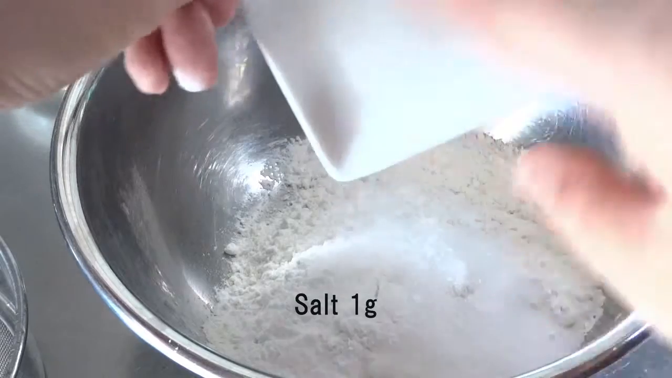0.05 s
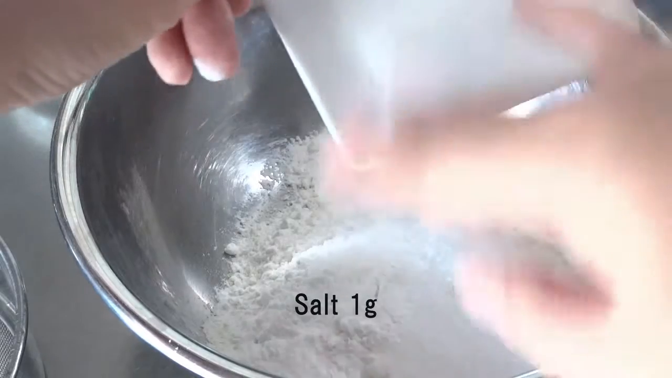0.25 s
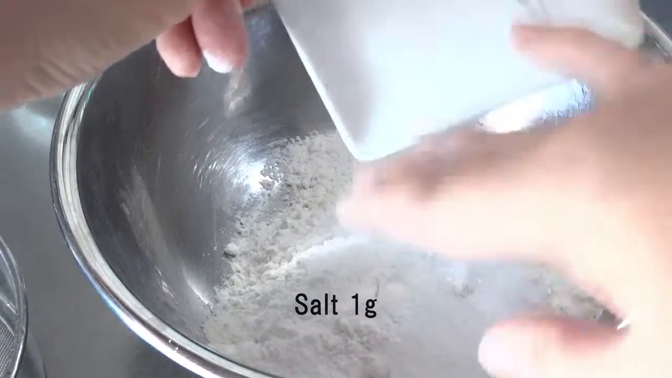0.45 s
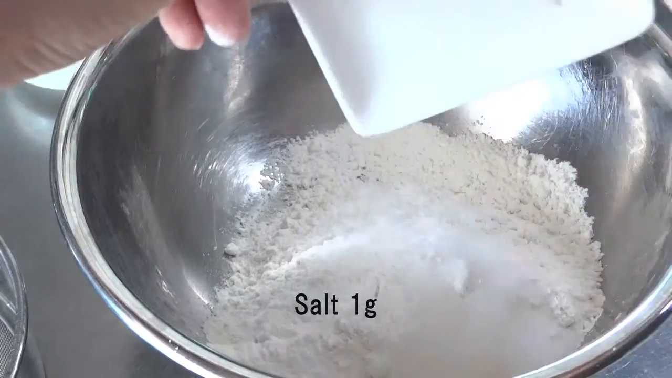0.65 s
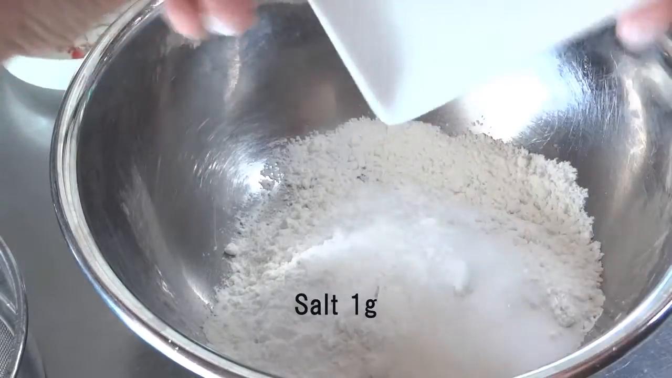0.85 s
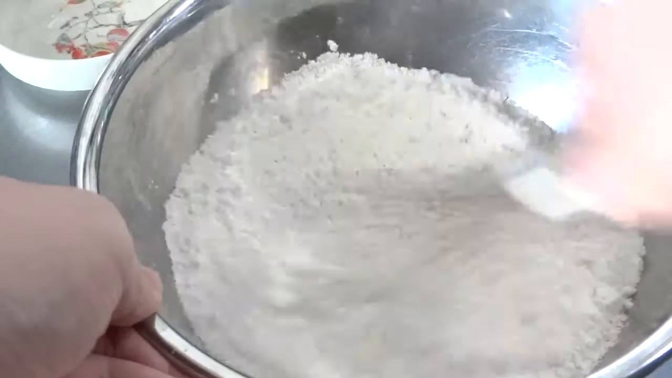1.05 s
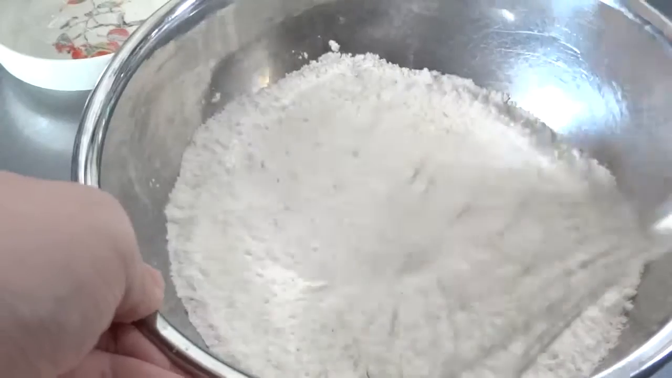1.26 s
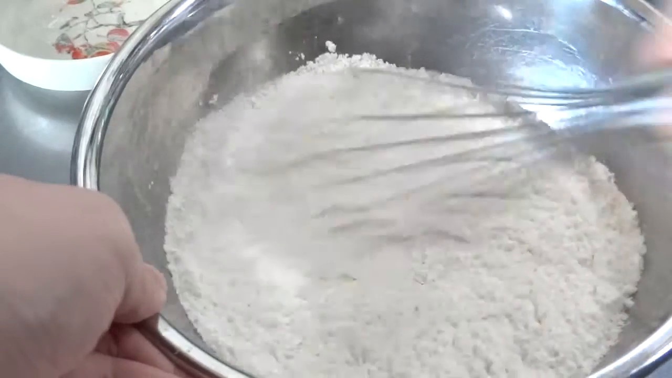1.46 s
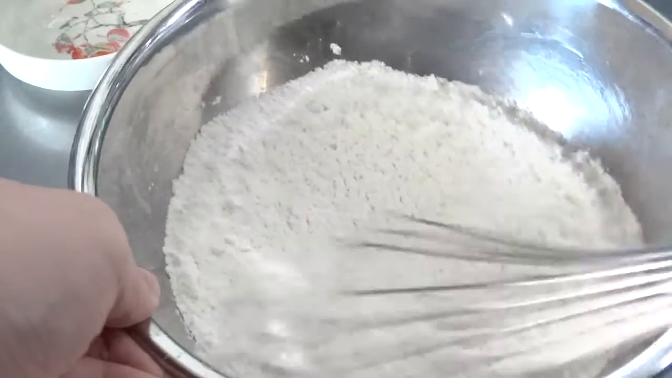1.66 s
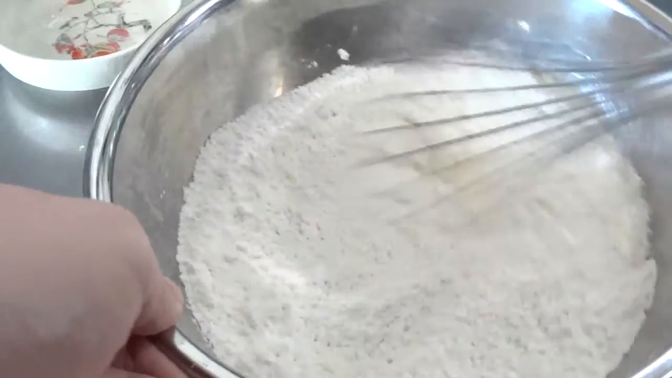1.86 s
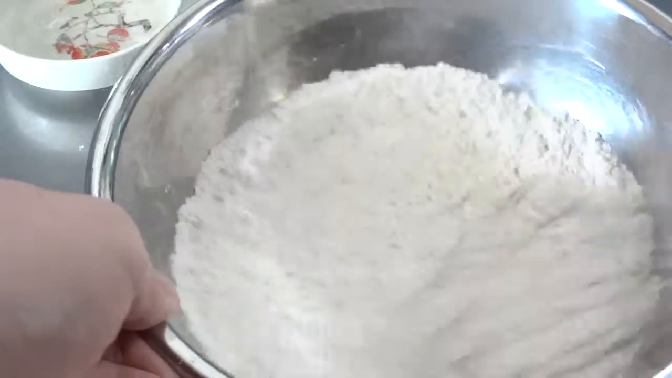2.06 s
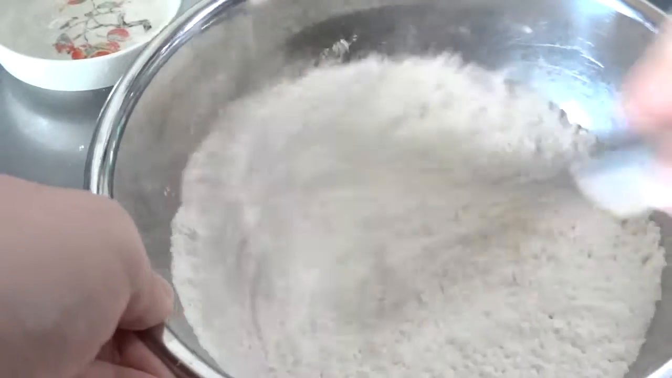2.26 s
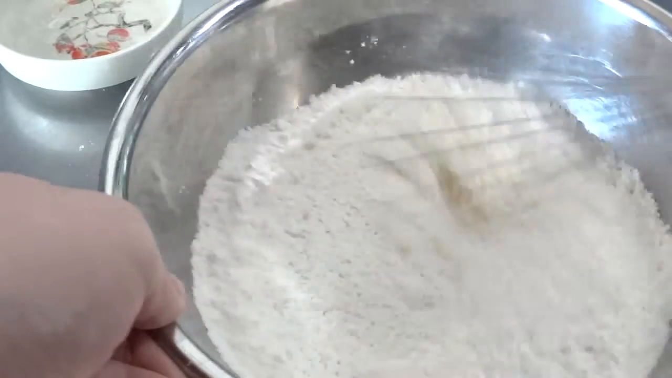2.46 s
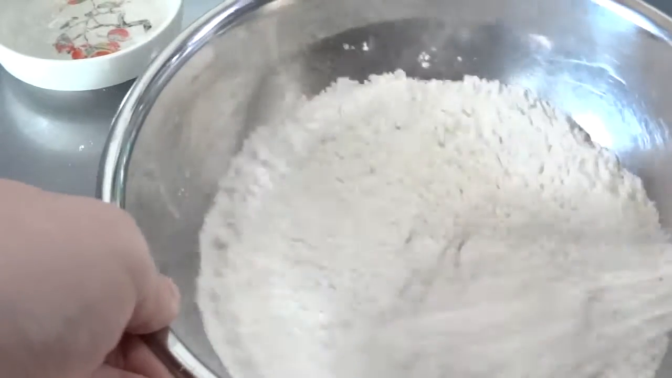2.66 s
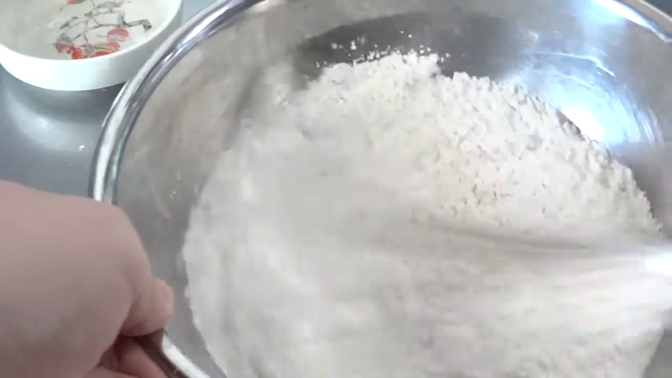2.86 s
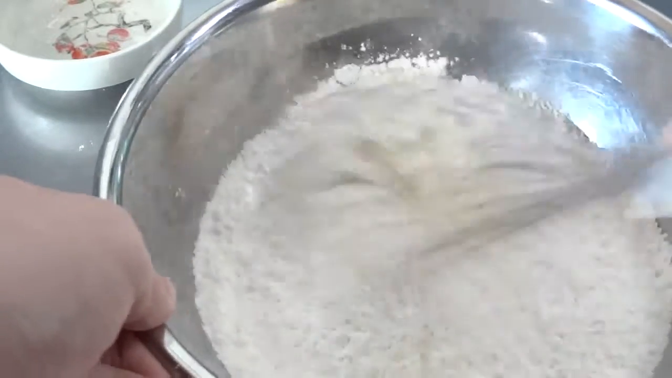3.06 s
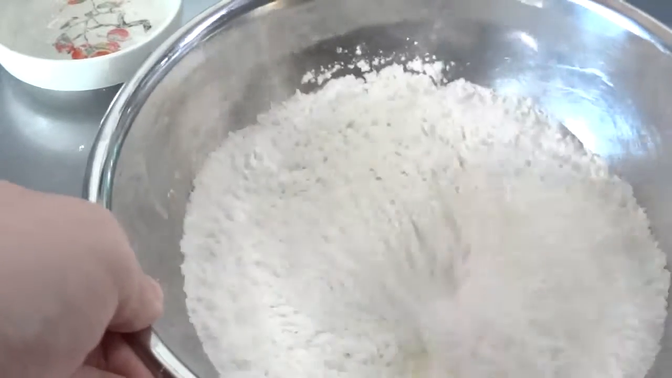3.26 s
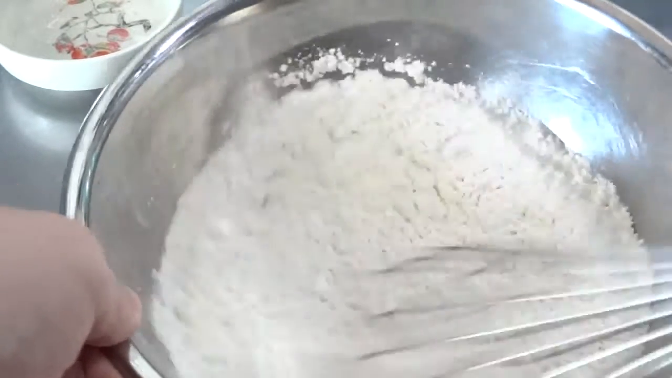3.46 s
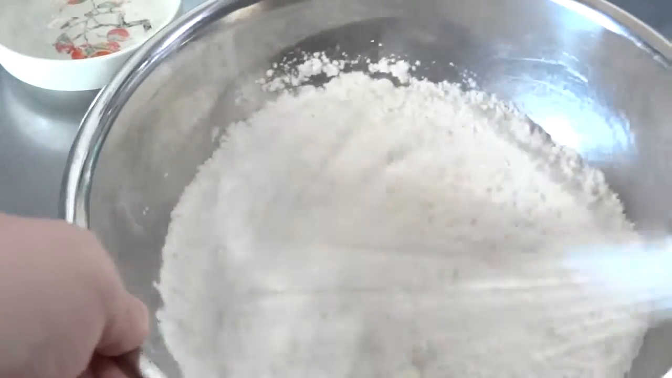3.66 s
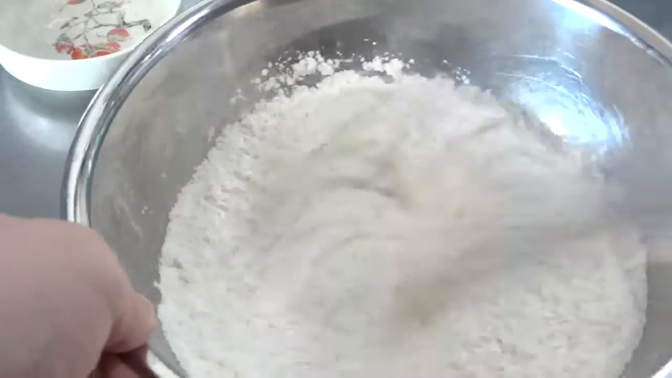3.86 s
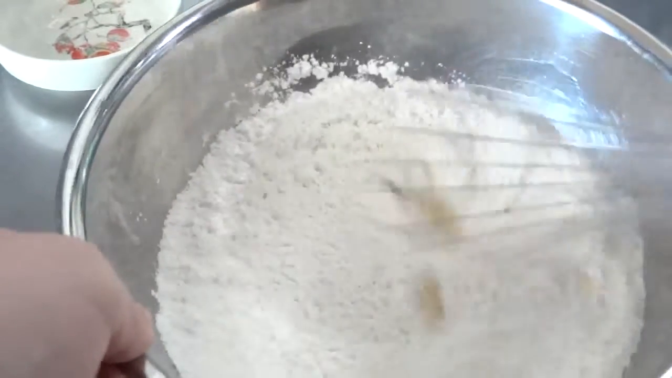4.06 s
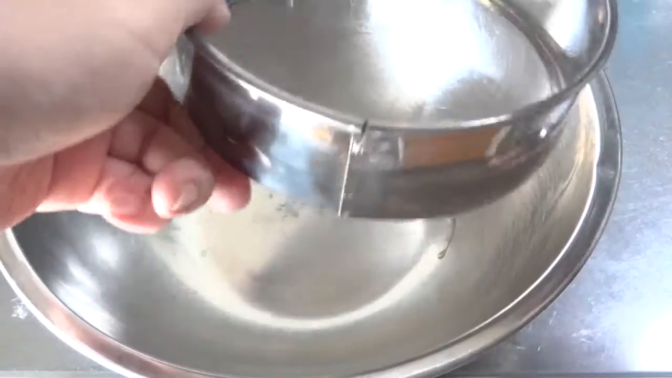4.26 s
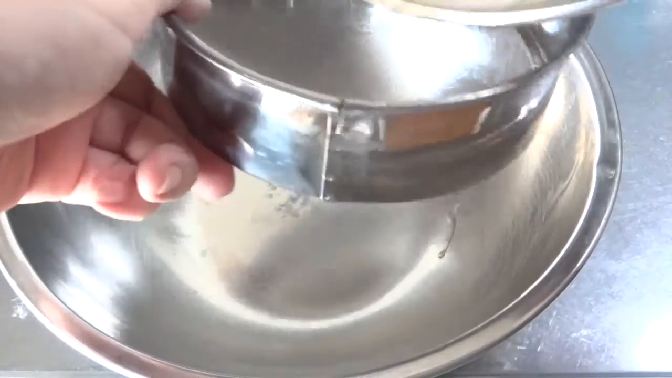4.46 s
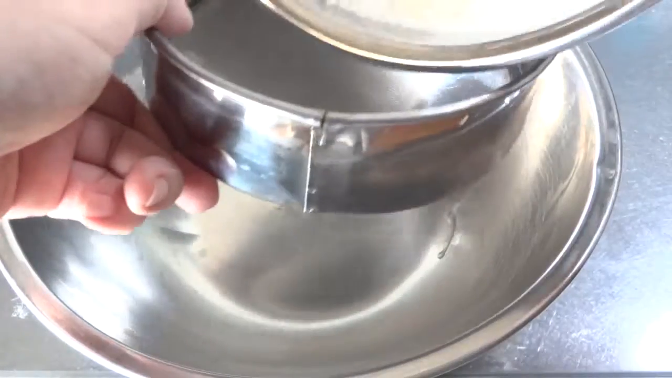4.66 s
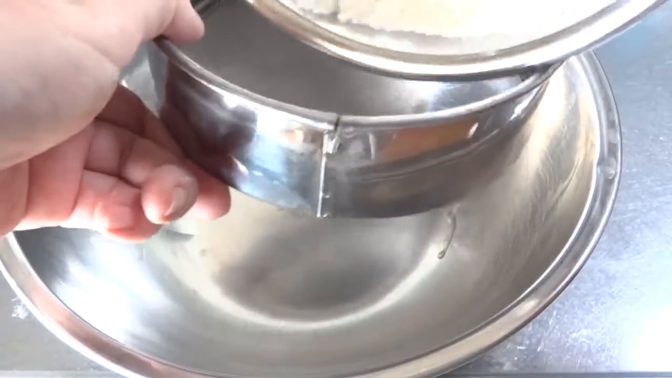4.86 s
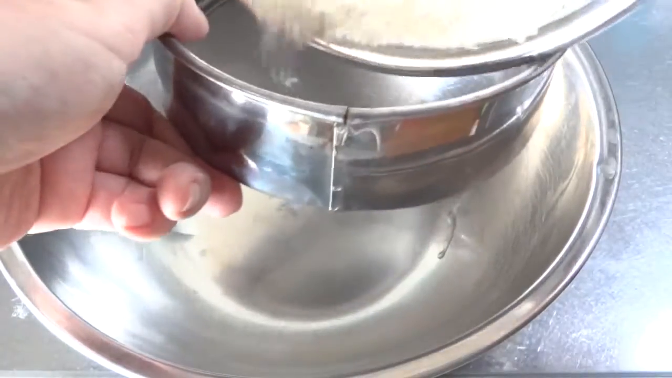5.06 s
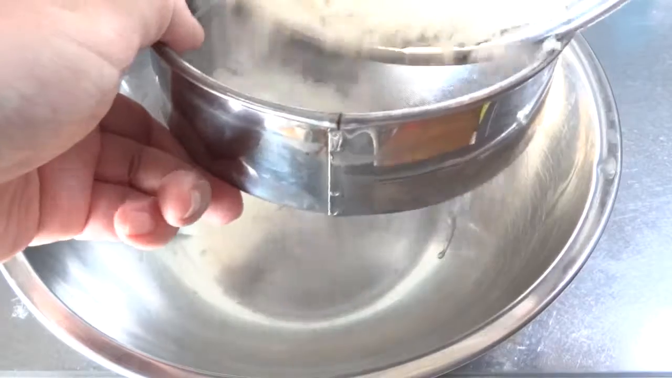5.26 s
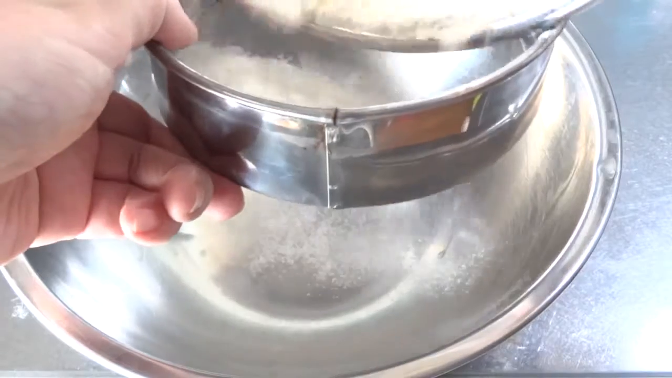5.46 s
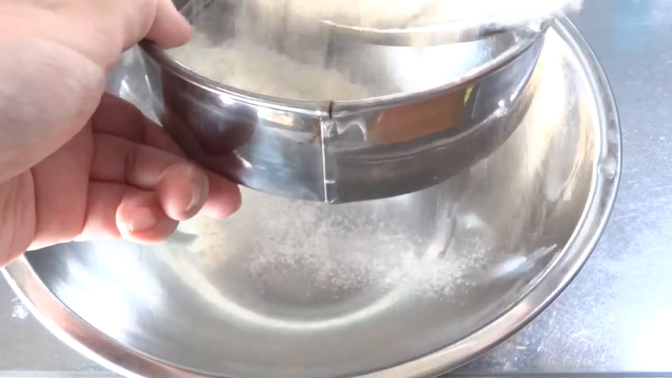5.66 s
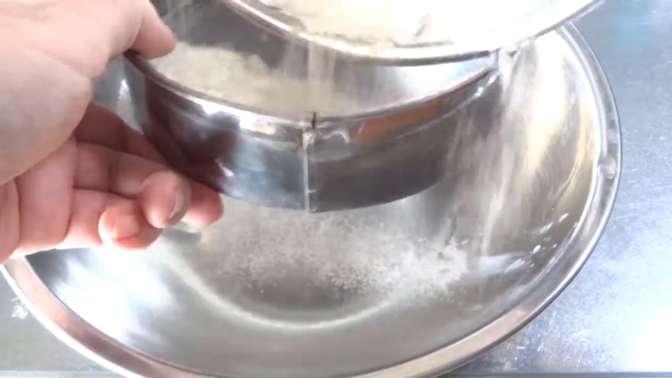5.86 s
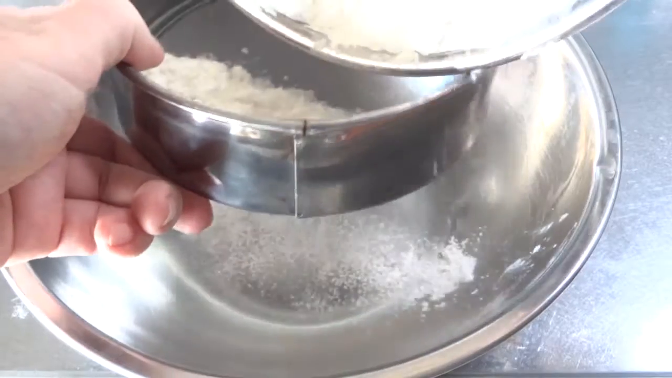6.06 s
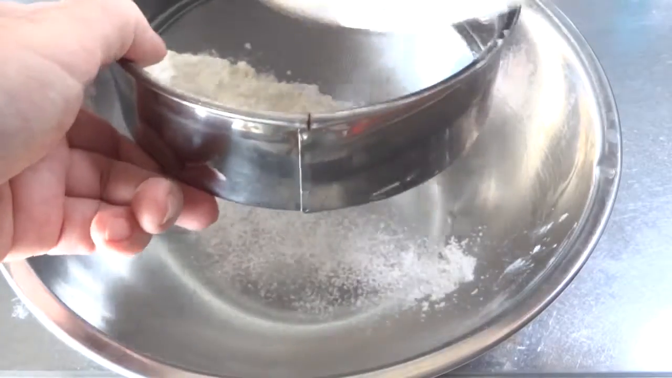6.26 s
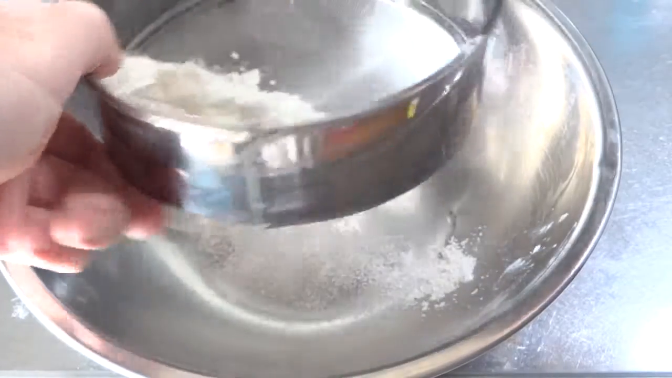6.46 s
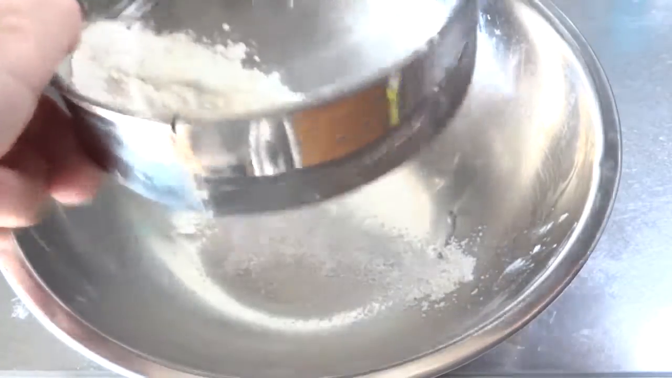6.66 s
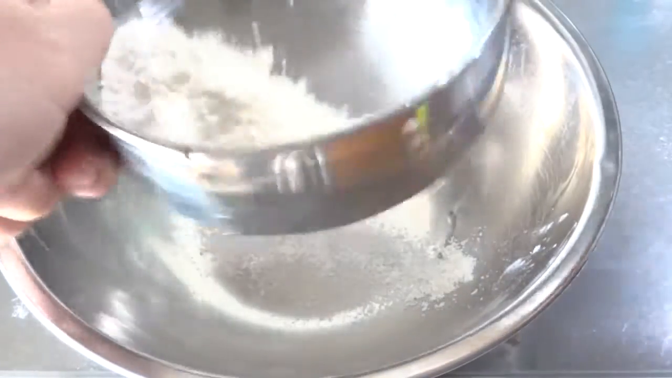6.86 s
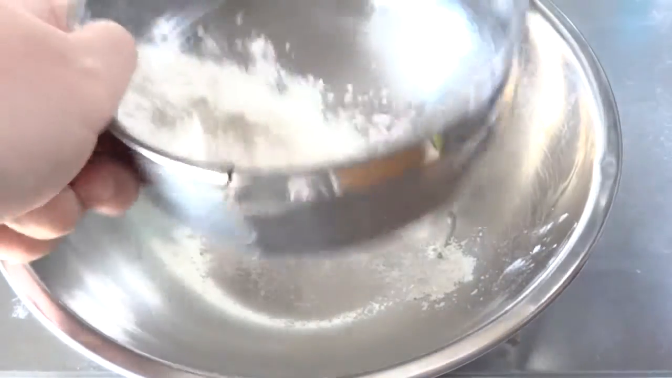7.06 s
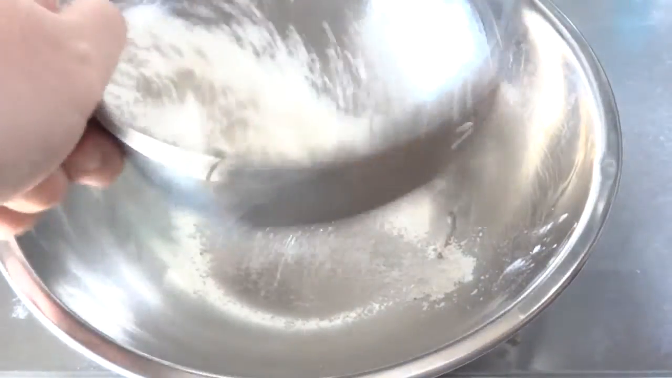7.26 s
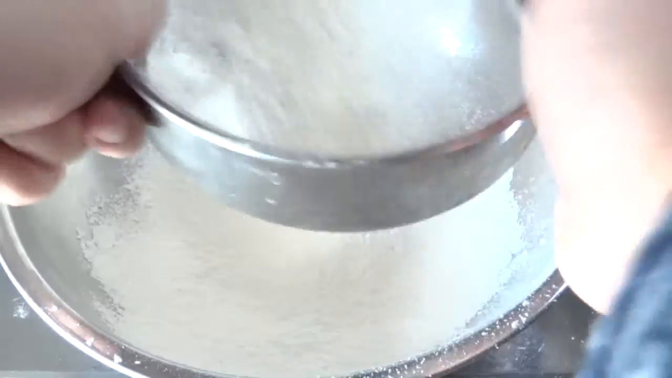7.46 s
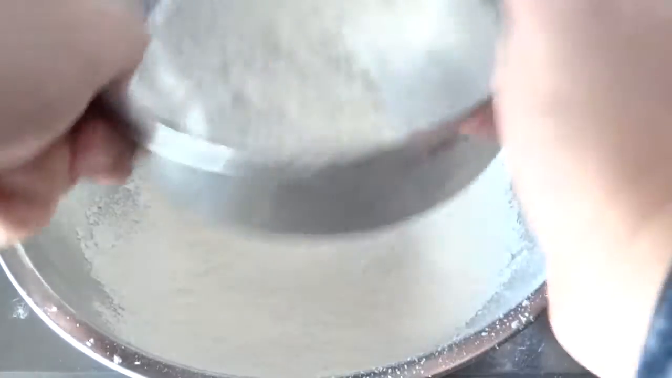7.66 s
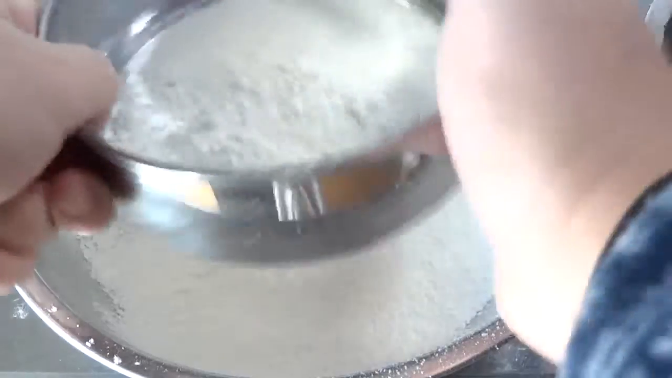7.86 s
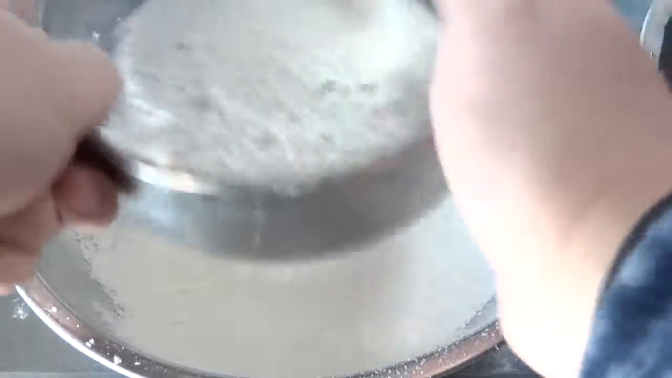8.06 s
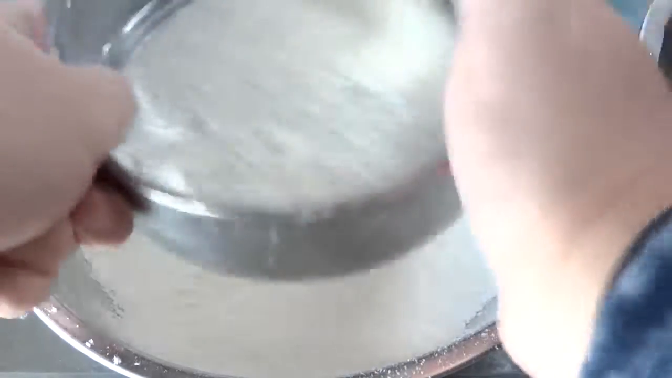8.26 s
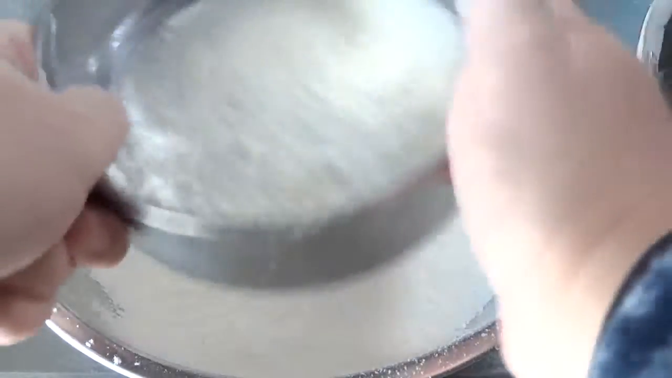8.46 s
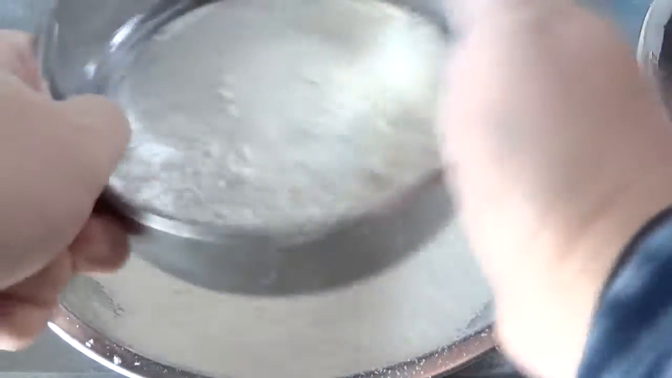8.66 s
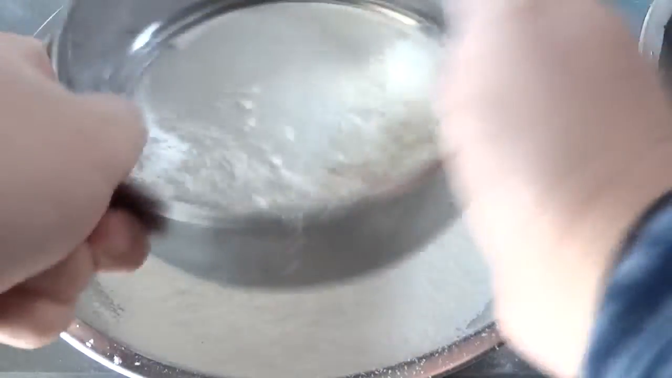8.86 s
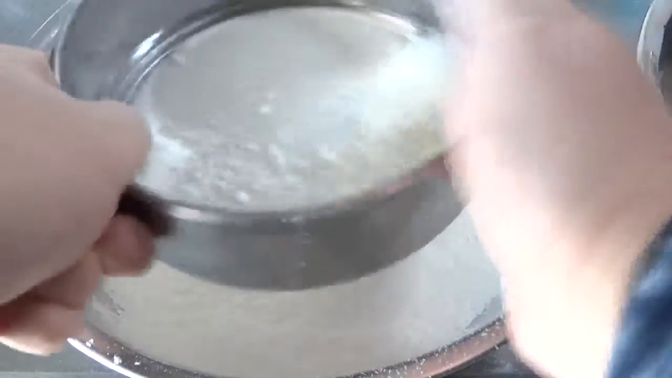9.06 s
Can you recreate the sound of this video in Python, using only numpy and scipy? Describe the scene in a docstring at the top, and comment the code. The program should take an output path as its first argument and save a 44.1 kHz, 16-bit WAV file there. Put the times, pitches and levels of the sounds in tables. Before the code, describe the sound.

In a small kitchen, heard close with a short room tail and quiet room noise, salt trickles in faint, fine pinches at about 0.2, 0.5 and 0.75 s. At 1.1 s a cut brings brisk whisking until 4.2 s: some eight or nine uneven strokes a second, wires scraping steel, powdery hiss, hard knocks strongest around 1.75 and 1.96 s, thin wire snaps and soft low thuds. From 4.3 s a low fan hum sits behind. The tipped bowl bumps a sieve at 4.5 s, clinks brightly at 4.75 and 4.97 s, slides briefly, and clinks more softly to 5.5 s. At 6.17 s the empty bowl lands on the counter with a lower ring, knocks again, then judders and scrapes near 6.4 s. From 7.4 to 9.2 s the sieve hoop is tapped five times a second, dry metallic pats with flour swishing back and forth.

```python
"""Salt trickles, a whisk scrapes and knocks in a steel bowl, the bowl clinks on a sieve, lands on the counter,
and the sieve is tapped with a powdery swish: baking in a small kitchen, in four shots.
Blows are clicks with a dying chatter that ring steel modes; rubs are streams of tiny slips through the same steel;
salt and flour are coloured grains. Room noise lies under everything, and a fan hums behind the last two shots."""
import sys
import numpy as np
from scipy import signal
from scipy.fft import rfft, irfft, next_fast_len
from scipy.io import wavfile

SR = 44100
rng = np.random.default_rng(int(sys.argv[2]) if len(sys.argv) > 2 else 0)


def master_out(mix):
    """Clip the mix to full scale and print it as 16-bit PCM to the path in sys.argv[1]."""
    frames = np.transpose(np.atleast_2d(mix))
    ceiling = np.clip(frames, -1, 1)
    pcm = np.round(ceiling * 32767).astype(np.int16)
    wavfile.write(sys.argv[1], SR, pcm)


N = 401784
TIME = np.arange(N) / SR

# All levels in the tables are the designer's balance within a layer; each layer adds its own trim.

# Spans of the shots: start and end in seconds; the salt plays before the whisk shot.
WHISK_SHOT, POUR_SHOT, SIFT_SHOT = (1.112, 4.225), (4.305, 7.328), (7.352, 9.2)
CUTOFF_HZ = 15900

# Room noise colour. Each row: frequency in Hz, relative level in dB.
ROOM_COLOUR = [(12, -32), (20, -2), (53, -2.5), (130, -12.5), (337, -12), (558, -16.5), (1060, -18),
               (1220, -17.5), (1370, -17.5), (2460, -18), (3740, -19.5), (13500, -22.5), (16000, -24.5)]
# Low room tone colour. Each row: frequency in Hz, relative level in dB.
LOW_ROOM_COLOUR = [(24, -29), (34, -1), (46, -26), (200, -90)]
# Stereo likeness of the background. Each row: frequency in Hz, left-right correlation (0 to 1).
LIKENESS = [(30, .88), (100, 0.64), (300, 0.17), (1000, 0.086), (4000, 0.039), (16000, .05)]
ROOM_DB, LOW_ROOM_DB = -64, -71.5

# Shakes of the salt dish. Each row: peak time in seconds, level in dB.
SALT_SHAKES = [(0.22, -67.5), (0.5, -66.5), (0.745, -71)]
# Colour of falling salt. Each row: frequency in Hz, relative level in dB.
SALT_COLOUR = [(2500, -28), (4300, -9), (4700, 3), (5100, -16), (8200, -10), (8800, -5), (9400, -12),
               (16000, -17)]
SALT_RISE_S, SALT_FALL_S = .06, .04   # each pinch swells and dies away

# Strokes of the whisk. Each row: time of the hardest push in seconds, level of wires on steel in dB,
# half length in seconds, bowl body in dB relative to the wires, extra powder hiss in dB.
STROKES = [(1.119, -53.5, 0.024, 4.5, -1), (1.222, -43, 0.023, -2.5, -5), (1.33, -47, 0.036, -12, -2),
           (1.394, -54, 0.014, 8, -2), (1.511, -38, .027, -8.5, -2.5), (1.618, -45, 0.042, -3, -0.5),
           (1.801, -38.5, 0.03, -5.5, -1.5), (1.934, -43.5, 0.027, -6, -1), (2.06, -50, .04, 0, -1),
           (2.166, -49.5, 0.04, -18, -1.5), (2.291, -46.5, 0.04, -13, -0.5),
           (2.413, -42.5, 0.035, -10.5, 3), (2.587, -45.5, 0.04, -1.5, -1.5), (2.675, -42.5, 0.034, -8, 0),
           (2.755, -42.5, 0.035, -4, 4.5), (2.878, -45.5, 0.032, 0.5, -1.5), (2.993, -42, 0.015, -5.5, -3),
           (3.052, -46.5, 0.039, -8.5, 4.5), (3.177, -50, 0.041, 2, -1), (3.328, -42, 0.039, -4, 0),
           (3.444, -45, 0.034, -2, 0.5), (3.599, -45, 0.044, -2, 2.5), (3.734, -43.5, .028, -4.5, 5),
           (3.863, -40, 0.035, -8, 2), (4.002, -45.5, 0.035, 0, 3.5), (4.122, -40.5, 0.039, -10.5, 2.5),
           (4.206, -50.5, 0.017, 1, -2)]
STROKE_RISE, STROKE_FALL = 0.95, 1.055   # shares of the half length
DRAG_DB, DRAG_BODY_DB, DRAG_HISS_DB = -55, -59, -53.5   # the whisk keeps moving between strokes
USUAL_STROKE_DB, USUAL_HISS_DB, HISS_FOLLOWS = -44.5, -47.5, 0.6   # hiss grows more slowly than the scrape
PUSH_DB, PUSH_SHARE_DB = -62, -7   # shoved flour: a steady part and a part that follows the bowl body
# The whisk comes clear of the flour for a moment. Each row: time in seconds, loss in dB.
LIFTS = [(1.453, 10), (1.742, 4.5)]
LIFT_S = 0.016
# Whisk knocks on the bowl. Each row: start in seconds, level in dB, bass tilt in dB, treble tilt in dB
# (both count against the mean of the table), 60 dB decay of the chatter in seconds.
WHISK_KNOCKS = [(1.209, -28, -18, -24, 0.099), (1.474, -32.5, -23, -19, 0.087),
                (1.493, -26.5, -22, -17, 0.16), (1.589, -31, -7, -17, 0.14), (1.649, -24, -21, -6.5, 0.09),
                (1.758, -20.5, -43, -21, 0.067), (1.779, -20.5, -23, -19, 0.092),
                (1.964, -16.5, -19, -2.5, 0.11), (2.043, -26.5, 6, -18, 0.15),
                (2.268, -23, -27, -20.5, 0.12), (2.559, -36, 10, -21, 0.11), (3.424, -24.5, -23, -19, 0.16),
                (3.719, -29.5, -14, -12, 0.16), (3.859, -28.5, -2, -18, 0.19), (4.108, -35, -34, 5, 0.11)]
# Wires snapping against the wall. Each row: start in seconds, level in dB, bass tilt in dB,
# treble tilt in dB, 60 dB decay of the chatter in seconds.
WIRE_SNAPS = [(1.3299, -39, -19, -11, 0.08), (1.5554, -27.5, -26, -7, 0.053), (1.9365, -31.5, -10, 3, 0.11),
              (2.2667, -39, -13, -24, 0.078), (2.6694, -31, -15, -12, 0.077),
              (2.9786, -25.5, -16.5, -16, 0.07), (3.1009, -32.5, -31, -27, 0.06),
              (3.5994, -47, -7, -6, 0.067)]
# Pressed whisk thudding the bowl on the counter. Each row: peak time in seconds, level in dB,
# rise and fall width in seconds.
THUDS = [(2.59, -50, 0.017), (2.63, -50.5, 0.033), (2.75, -50, 0.028), (2.87, -50.5, 0.028),
         (3.185, -46.5, 0.027), (3.9, -47.5, 0.025)]
# Modes of the bowl with flour in it. Each row: nominal frequency in Hz, relative level in dB, t60 in seconds.
FULL_BOWL = [(361, -6, 0.13), (443, -6.5, 0.15), (740.6, -0.5, 0.17), (880, -12, 0.039),
             (1182, -2.5, 0.073), (1299, 14, 0.04), (2280, -9, .04), (2900, -15, 0.024), (3280, 2, 0.032),
             (3960, 4, 0.044), (4150, 4.5, 0.035), (7700, 1, .015)]
# Modes of the whisk wires. Each row: nominal frequency in Hz, relative level in dB, t60 in seconds.
WIRE_MODES = [(2895, 7, 0.061), (3270, -8, 0.12), (3930, 1, 0.041), (3800, 7.5, 0.078), (4100, -3, 0.055)]
# Colour of the stirring. Each row: frequency in Hz, relative level in dB.
WHISK_COLOUR = [(41, -74), (70, -18), (98, -12), (145, -14.5), (451, -1.5), (606, -2.5), (761, 7.5),
                (955, 2), (1310, -4), (1690, -4.5), (2320, -6.5), (4000, -7), (4480, -10), (11900, -16),
                (16000, -20)]
# Colour of the wire snaps. Each row: frequency in Hz, relative level in dB.
WIRE_COLOUR = [(250, -20), (700, -2), (1700, -11), (2900, -11), (4000, 5), (4700, -12.5), (16000, -24)]
# Colour of the thuds. Each row: frequency in Hz, relative level in dB.
THUD_COLOUR = [(30, -13), (70, 4.5), (110, -7), (145, -11.5), (230, -3.5), (350, -3.5), (480, -4.5),
               (800, -15), (3000, -64)]

# Rumble of the working hands. Each row: frequency in Hz, relative level in dB.
RUMBLE_COLOUR = [(20, -6), (35, -7.5), (90, -0.5), (140, -11.5), (250, -7), (600, -68)]

# Fan noise colour. Each row: frequency in Hz, relative level in dB.
FAN_COLOUR = [(76, -35), (130, -35), (167, -1.5), (198, -5), (230, -11.5), (368, -4), (427, -7.5),
              (1270, -16.5), (2000, -18.5), (2600, -55), (4400, -120)]
# Fan tones. Each row: frequency in Hz, centre level in dB.
HUM = [(53.8, -69), (166.9, -80.5), (231.5, -71.5), (328.4, -77.5)]

# Bowl bumping the sieve. Each row: start in seconds, level in dB, bass tilt in dB, treble tilt in dB,
# 60 dB decay of the chatter in seconds.
BOWL_BUMPS = [(4.489, -27.5, -15, -15, 0.04), (4.529, -35, -19, -25, 0.035)]
# Bowl rim clinking on the sieve. Each row: start in seconds, level in dB, bass tilt in dB,
# treble tilt in dB, 60 dB decay of the chatter in seconds.
RIM_CLINKS = [(4.735, -34.5, -14, -30, 0.03), (4.747, -15.5, -27.5, -16, 0.044),
              (4.753, -17.5, -26, -19, 0.055), (4.966, -17, -27, -20.5, 0.019),
              (5.287, -28, -22.5, -21, 0.048), (5.401, -27, -19.5, -18, 0.046),
              (5.544, -42.5, -19, -17, 0.041)]
# Slips of the rim along the sieve. Each row: peak time in seconds, level in dB, half length in seconds.
RIM_SLIPS = [(4.985, -50, 0.055), (5.062, -41, .016), (5.124, -44.5, .02), (5.18, -45.5, .018),
             (5.42, -56, .04), (5.5, -52, .015), (5.759, -61, .018), (5.92, -68, 0.044)]
# Modes of the bowl wall. Each row: nominal frequency in Hz, relative level in dB, t60 in seconds.
WALL_MODES = [(673, -4.5, 0.38), (1090, -13, 0.28), (1240, -13.5, .3), (1770, -7, .25), (1710, -2.5, .25),
              (2190, -3, .25), (2340, -3, 0.18), (2750, -4, .15), (3400, -10, 0.178)]
# Rim modes, also lent to the sieve hoop. Each row: nominal frequency in Hz, relative level in dB, t60 in seconds.
RIM_MODES = [(1710, -16, 0.49), (2006, 2, 0.2), (2126, -5, 0.14), (2374, -43, 0.77), (2720, -12, 0.18),
             (2960, -2.5, 0.15), (3030, -18, 0.053), (3620, -28, 0.11), (3320, -22, 0.3),
             (3820, -15, 0.074), (3865, -16, 0.2), (3760, -20, 0.26), (4960, -22, 0.19), (5200, -42, 0.25),
             (5900, -28, 0.28), (6700, -35, 0.14), (7445, -36, 0.21), (8947, -28, 0.25)]
# Colour of the wall bumps. Each row: frequency in Hz, relative level in dB.
WALL_COLOUR = [(180, -59), (300, -18), (331, -19), (614, -6.5), (667, -7), (900, -13), (2210, -5),
               (2480, -8), (2740, -13.5), (14700, -31), (16000, -44)]
# Colour of the rim. Each row: frequency in Hz, relative level in dB.
RIM_COLOUR = [(200, -38), (400, -22), (680, -7.5), (850, -18.5), (1100, -9.5), (1650, -13), (2100, -6),
              (2600, -5.5), (3100, -0.5), (3600, -4.5), (4100, -10.5), (4700, -20.5), (8800, -20.5),
              (16000, -31)]

# Bowl landing on the counter. Each row: start in seconds, level in dB, bass tilt in dB, treble tilt in dB,
# 60 dB decay of the chatter in seconds.
SET_DOWN = [(6.172, -23, -20.5, -35, 0.14), (6.283, -38.5, -7.5, -29, 0.072)]
# The foot catching on the counter. Each row: start in seconds, level in dB, bass tilt in dB,
# treble tilt in dB, 60 dB decay of the chatter in seconds.
FOOT_CATCHES = [(6.391, -36.5, -12, -38, 0.067), (6.442, -38, -7, -22, 0.073), (6.467, -38, -6, -23, 0.06),
                (6.496, -43.5, -11, -21, 0.06)]
# Modes of the empty bowl. Each row: nominal frequency in Hz, relative level in dB, t60 in seconds.
EMPTY_BOWL = [(524, -0.5, 0.45), (641, -21, .23), (904, -27, 0.22), (1590, -13, 0.22), (1717, -6, 0.15),
              (1835, -18, .22), (2220, -3.5, 0.12), (2430, -22, 0.13), (2940, -25, .18), (4360, -13, .12),
              (6158, -25, .15)]
# Modes of the bowl pressed on the counter. Each row: nominal frequency in Hz, relative level in dB, t60 in seconds.
PRESSED_BOWL = [(455, -2, 0.11), (507, 2, 0.14), (746, -3, 0.14), (1053, -3, .08)]
# Colour of the foot's blows. Each row: frequency in Hz, relative level in dB.
FOOT_COLOUR = [(190, -70), (330, -30.5), (520, -1.5), (592, -16.5), (743, -12.5), (1420, -19.5),
               (1540, -19.5), (2070, -17), (2240, -17.5), (3590, -33.5), (7830, -33), (16000, -44)]
# Colour of the foot rubbing on the counter. Each row: frequency in Hz, relative level in dB.
SHOVE_COLOUR = [(200, -45), (350, -17), (600, -3), (1000, -6), (2200, -8), (3200, -10), (4000, -24),
                (8000, -21), (16000, -32)]
# the bowl foot is shoved once over the counter
SHOVE_S, SHOVE_DB, SHOVE_RISE_S, SHOVE_FALL_S = 6.39, -58, 0.034, .06

# Knocks of the hoop on the hand. Each row: start in seconds, level in dB, bass tilt in dB, treble tilt in dB,
# level of the flour thrown in dB, lag of its swish in seconds.
SIEVE_TAPS = [(7.405, -31, -16, -18, -55.5, 0.037), (7.575, -29.5, -22, -15, -63, .025),
              (7.78, -37, -18, -16, -66, 0.021), (7.987, -40, -16, -7, -53, -0.0097),
              (8.188, -30.5, -12.5, -8, -52, 0.0086), (8.382, -28.5, -19, -12.5, -57.5, 0.027),
              (8.572, -27.5, -18.5, -13, -58, 0.021), (8.765, -33.5, -13.5, -12.5, -58, 0.024),
              (8.973, -27.5, -16.5, -17, -57, .055)]
# Colour of the hoop knocks. Each row: frequency in Hz, relative level in dB.
SIEVE_COLOUR = [(53, -34), (90, -7), (196, -4), (593, -3.5), (1040, -5), (1350, -11.5), (1640, -10),
                (1830, -12), (2130, -4.5), (3360, 0.5), (4860, -8), (11600, -10.5), (14700, -18),
                (16000, -23)]
# Colour of flour on the mesh. Each row: frequency in Hz, relative level in dB.
MESH_COLOUR = [(600, -28), (1000, -15), (1700, -9), (3400, 1), (4800, -3), (7000, -4.5), (10000, -2.5),
               (13000, -5), (16000, -10)]
TAP_CHATTER_S = 0.042
SWISH_RISE_S, SWISH_FALL_S = 0.029, 0.026
# flour slides back as the hoop is drawn away for the next knock
BACKSWISH_LEAD_S, BACKSWISH_DB, BACKSWISH_S = 0.069, -59.5, 0.023
FIRST_SLIDE_S, FIRST_SLIDE_DB = 7.36, -56   # the heap shifts as the shaking starts
LOOSE_S, PACKED_DB, MESH_DB = 8.1, -18, -65.5   # the heap starts packed and loosens; patter through the mesh


def from_db(db):
    """Decibels to gain."""
    return 10 ** (np.asarray(db) / 20)


def rms_one(x):
    """Scale to an rms of one."""
    return x / np.sqrt(np.mean(x ** 2) + 1e-20)


def unit_energy(x):
    """Scale a response so that it passes white noise at the same level."""
    return x / np.sqrt(np.sum(x ** 2, axis=-1, keepdims=True) + 1e-20)


def during(span, fade=0.0034):
    """Gate that is one inside a span, with short linear fades in seconds."""
    nearest_edge = np.minimum(TIME - span[0], span[1] - TIME)
    return np.clip(nearest_edge / fade + .5, 0, 1)


def later_shots():
    """Gate for the pouring and sifting shots."""
    return during(POUR_SHOT, fade=0.013) + during(SIFT_SHOT)


def swell(s, rise_s, fall_s):
    """Bell-shaped gain of one hand movement that peaks at s."""
    width = np.where(TIME < s, rise_s, fall_s)
    return np.exp(-.5 * np.minimum(((TIME - s) / width) ** 2, 100))


def drift(rate):
    """Slow random line through knots of spread one, with rate knots per second."""
    knots = rng.standard_normal(4000)
    return np.interp(TIME * rate, np.arange(len(knots)), knots)


def dying(t60, count):
    """Envelope that falls 60 dB in t60 seconds."""
    return np.exp(-np.log(1000) * TIME[:count] / max(t60, 1e-3))


def at_hz(points, hz):
    """Read a table on a log-frequency axis."""
    points = np.array(points)
    return np.interp(np.log(np.maximum(hz, 1)), np.log(points[:, 0]), points[:, 1])


def convolve(x, response):
    """Pass a sound through a response."""
    return signal.oaconvolve(np.atleast_2d(x), np.atleast_2d(response))[:, :N]


def band(x, low_hz, high_hz):
    """Band-pass."""
    sos = signal.butter(2, [low_hz, min(high_hz, .45 * SR)], "band", fs=SR, output="sos")
    return signal.sosfilt(sos, x)


def colour(points, bass_db=0, treble_db=0, size=4096):
    """Minimum-phase response with a given spectrum and two shelves."""
    hz = np.arange(size // 2 + 1) * SR / size
    shelves = at_hz([(900, bass_db), (1900, 0), (4300, 0), (6500, treble_db)], hz)
    cepstrum = irfft(np.log(from_db(at_hz(points, hz) + shelves)))
    # folding the cepstrum forward puts the energy at the start
    cepstrum[1:size // 2] *= 2
    cepstrum[size // 2 + 1:] = 0
    return unit_energy(irfft(np.exp(rfft(cepstrum))))


def steel(modes, spread_db, detune=0, count=22050):
    """Ringing of thin steel; each contact point weights the modes differently and loads them off pitch."""
    ringing = np.zeros(count)
    for hz, db, t60 in modes:
        gain = from_db(db + spread_db * rng.normal()) * rng.choice([-1, 1])
        pitch = hz * (1 + detune * rng.normal())
        ringing += gain * dying(t60, count) * np.sin(2 * np.pi * pitch * TIME[:count])
    return unit_energy(ringing)


def grains(per_s, spread_db):
    """Random tiny slips of uneven size, per_s of them a second on average."""
    sizes = from_db(spread_db * np.minimum(rng.exponential(1, N), 4)) * rng.choice([-1, 1], N)
    return rms_one(sizes * (rng.random(N) < per_s / SR))


def blows(rows, spectrum, modes, ring_db, chatter_db, detune=0, count=22050):
    """Each blow is a click and a dying chatter; the dense modes give its colour, the strong ones ring on."""
    out = np.zeros(N + count)
    usual_bass, usual_treble = np.mean(rows, axis=0)[2:4]
    for s, db, bass, treble, length in rows:
        contact = from_db(chatter_db) * unit_energy(rng.standard_normal(count) * dying(length, count))
        contact[0] += 1   # the click
        tone = colour(spectrum, bass - usual_bass, treble - usual_treble)
        crack = convolve(unit_energy(contact), tone)[0, :count]
        ring = from_db(ring_db) * steel(modes, spread_db=3.0, detune=detune)
        start = int(s * SR)
        out[start:start + count] += from_db(db) * (crack + ring)
    return out[:N]


def rub(spectrum, modes, ring_db, per_s, spread_db, detune=0.0233, count=3):
    """Dragged steel: a stream of slips sets its modes ringing, differently as the contact wanders."""
    slips = grains(per_s, spread_db)
    ringing = 0
    for _ in range(count):
        contact_point = steel(modes, spread_db=2.0, detune=detune)
        ringing = ringing + drift(rate=14) * convolve(slips, contact_point)
    return rms_one(convolve(slips, colour(spectrum)) + from_db(ring_db) * rms_one(ringing))[0]


def kitchen(x, scatter_s, room_db, pan_db=0, room_t60=0.28, count=16384):
    """Bowl and counter delay each frequency a little, unlike on the two sides; a room tail follows."""
    hz = np.arange(count // 2 + 1) * SR / count
    knots_hz = np.linspace(0, SR / 2, num=200)
    delay = np.array([np.interp(hz, knots_hz, rng.exponential(1, len(knots_hz))) for side in range(2)])
    delay *= scatter_s * np.clip((hz - 200) / 900, 0, 1)   # long waves reach both sides alike
    phase = 2 * np.pi * np.cumsum(delay, axis=1) * SR / count
    near = irfft(np.exp(-1j * phase)) * (TIME[:count] < .1)
    tail = band(rng.standard_normal((2, count)), 193, 11500) * dying(room_t60, count) * (TIME[:count] > .005)
    response = unit_energy(near + from_db(room_db) * unit_energy(tail))
    return convolve(x, response) * from_db([[pan_db / 2], [-pan_db / 2]])


def moving(x, swing, per_s):
    """Contact points keep shifting, so short waves reach each side with a restless phase (swing in radians)."""
    size = next_fast_len(N)
    hz = np.arange(size // 2 + 1) * SR / size
    short = rfft(x, size) * np.clip((hz - 300) / 700, 0, 1)
    treble = irfft(short, size)[:, :N]
    quarter_turn = irfft(1j * short, size)[:, :N]
    phase = swing * np.array([drift(per_s), drift(per_s)])
    return x + (np.cos(phase) - 1) * treble + np.sin(phase) * quarter_turn


def air(spectrum):
    """Steady stereo noise, most alike on both sides in the bass."""
    size = next_fast_len(N)
    hz = np.arange(size // 2 + 1) * SR / size
    alike = np.clip(at_hz(LIKENESS, hz), -1, 1)
    mid, side = rfft(rng.standard_normal((2, size)))
    both = np.sqrt(1 + alike) * mid + np.sqrt(1 - alike) * side * [[1], [-1]]
    return rms_one(irfft(both * from_db(at_hz(spectrum, hz)), size)[:, :N])


def room_noise():
    """Coloured noise of the room under every shot, down to a quarter of its gain in the gaps."""
    room = from_db(ROOM_DB) * air(ROOM_COLOUR) + from_db(LOW_ROOM_DB) * air(LOW_ROOM_COLOUR)
    return room * np.maximum(during((-1, WHISK_SHOT[1]), fade=.04) + later_shots(), .25)


def salt():
    """Fine crystals slide off a dish, a pinch with each shake."""
    flow = sum(from_db(db) * swell(s, SALT_RISE_S, SALT_FALL_S) for s, db in SALT_SHAKES)
    crystals = convolve(grains(per_s=2600, spread_db=12.0), colour(SALT_COLOUR))
    trickle = flow * during((0, WHISK_SHOT[0])) * crystals
    return kitchen(trickle, scatter_s=0.0018, room_db=-9)


def stirring_effort():
    """Gains of scrape, bowl body, shoved flour and hiss: each stroke swells above the steady drag."""
    # powers add up here; the root at the end turns them into gains
    wires, body, hiss = from_db(DRAG_DB) ** 2, from_db(DRAG_BODY_DB) ** 2, from_db(DRAG_HISS_DB) ** 2
    for s, db, length, body_share, hiss_share in STROKES:
        power = swell(s, STROKE_RISE * length, STROKE_FALL * length) ** 2
        hiss_db = USUAL_HISS_DB + HISS_FOLLOWS * (db - USUAL_STROKE_DB) + hiss_share
        wires = wires + power * from_db(db) ** 2
        body = body + power * from_db(db + body_share) ** 2
        hiss = hiss + power * from_db(hiss_db) ** 2
    push = from_db(PUSH_DB) ** 2 + body * from_db(PUSH_SHARE_DB) ** 2
    lifted_db = sum(loss * swell(s, LIFT_S, LIFT_S) for s, loss in LIFTS)
    return np.sqrt([wires, body, push, hiss]) * from_db(-lifted_db) * during(WHISK_SHOT)


def whisk():
    """Wires scrape and knock the steel, shake the bowl, shove the flour and hiss through it."""
    wires, body, push, hiss = stirring_effort()
    scrape = rub(WHISK_COLOUR, FULL_BOWL, ring_db=-9.5, per_s=4500, spread_db=3.5)
    shake = rub(WHISK_COLOUR, FULL_BOWL, ring_db=-7.5, per_s=2000, spread_db=3.0, detune=0.0096)
    powder = convolve(grains(per_s=15000, spread_db=3.0), colour(WHISK_COLOUR))[0]
    sound = from_db(0.72) * wires * rms_one(band(scrape, 2330, 5950))
    sound += from_db(0.7) * body * rms_one(band(shake, 332, 2500))
    sound += from_db(2.5) * push * rms_one(band(shake, 87, 521))
    sound += from_db(0.05) * hiss * rms_one(band(powder, 6300, 18000))
    sound *= from_db(1.35 * drift(rate=90))   # the wires catch and let go one after another
    sound += from_db(12) * blows(WHISK_KNOCKS, WHISK_COLOUR, FULL_BOWL, ring_db=-4, chatter_db=12, detune=0.036)
    sound += from_db(16) * blows(WIRE_SNAPS, WIRE_COLOUR, WIRE_MODES, ring_db=0.5, chatter_db=7, detune=.015)
    pressing = sum(from_db(db) * swell(s, duration, duration) for s, db, duration in THUDS)
    thud = convolve(grains(per_s=900, spread_db=3.0), colour(THUD_COLOUR))[0]
    sound += from_db(-1) * pressing * thud
    return kitchen(sound, scatter_s=.002, room_db=-7.5, pan_db=0.26) * from_db(3.0)


def working_rumble():
    """Low noise from the working hands while whisking and, softer, while sifting."""
    working = from_db(-63.5) * during(WHISK_SHOT) + from_db(-70.5) * during(SIFT_SHOT)
    return working * air(RUMBLE_COLOUR)


def fan():
    """Coloured noise and tones that waver in level and phase, behind the last two shots."""
    tones = 0
    for hz, db in HUM:
        gain = np.sqrt(2) * from_db(db + 1.7 * drift(rate=6.2))
        tones = tones + gain * np.sin(2 * np.pi * hz * TIME + 0.81 * drift(rate=12))
    return (from_db(-66.5) * air(FAN_COLOUR) + from_db(-1.5) * tones) * later_shots()


def pouring():
    """The tipped bowl bumps the sieve, then its rim clinks and slides on it."""
    bumps = from_db(15.0) * blows(BOWL_BUMPS, WALL_COLOUR, WALL_MODES, ring_db=-4.0, chatter_db=20)
    clinks = from_db(18.5) * blows(RIM_CLINKS, RIM_COLOUR, RIM_MODES, ring_db=-12.0, chatter_db=6.5, detune=.015)
    slipping = sum(from_db(db) * swell(s, length, length) for s, db, length in RIM_SLIPS)
    slide = from_db(-0.5) * slipping * rub(RIM_COLOUR, RIM_MODES, ring_db=-4, per_s=700, spread_db=1.0)
    return kitchen(bumps + clinks + slide, scatter_s=0.002314, room_db=-7.5, pan_db=0.5)


def setting_down():
    """The empty bowl lands on the counter, rings and judders aside at a lower pitch."""
    landing = from_db(15) * blows(SET_DOWN, FOOT_COLOUR, EMPTY_BOWL, ring_db=2.0, chatter_db=6)
    judder = from_db(15) * blows(FOOT_CATCHES, FOOT_COLOUR, PRESSED_BOWL, ring_db=2, chatter_db=19)
    shove = from_db(4.0) * from_db(SHOVE_DB) * swell(SHOVE_S, SHOVE_RISE_S, SHOVE_FALL_S)
    slide = shove * rub(SHOVE_COLOUR, PRESSED_BOWL, ring_db=-8, per_s=500, spread_db=-2.5)
    return kitchen(landing + judder + slide, scatter_s=0.001506, room_db=-8.5, pan_db=1.5)


def sieve():
    """The hoop knocks a hand five times a second; each swing throws the flour back and forth over the mesh."""
    knocks = [(s, db, bass, treble, TAP_CHATTER_S) for s, db, bass, treble, *_ in SIEVE_TAPS]
    taps = from_db(18.5) * blows(knocks, SIEVE_COLOUR, RIM_MODES, ring_db=-26, chatter_db=8.0, detune=0.0213)
    forth = sum(from_db(thrown) * swell(s + lag, SWISH_RISE_S, SWISH_FALL_S) for s, *_, thrown, lag in SIEVE_TAPS)
    forth += from_db(FIRST_SLIDE_DB) * swell(FIRST_SLIDE_S, SWISH_RISE_S, SWISH_FALL_S)
    back = sum(swell(s - BACKSWISH_LEAD_S, BACKSWISH_S, BACKSWISH_S) for s, *_ in SIEVE_TAPS)
    looseness = from_db(np.interp(TIME, [SIFT_SHOT[0], LOOSE_S], [PACKED_DB, 0]))
    loose_flow = looseness * np.hypot(from_db(BACKSWISH_DB) * back, from_db(MESH_DB))
    flow = np.hypot(forth, loose_flow) * during(SIFT_SHOT)
    swish = from_db(2.5) * flow * convolve(grains(per_s=11000, spread_db=4.0), colour(MESH_COLOUR))
    return kitchen(taps + swish, scatter_s=.002, room_db=-9.0, pan_db=1.5)


def scene():
    """All the work at the counter over its background; the stirring fades out with its shot."""
    stirring = moving(whisk(), swing=1.25, per_s=70) * during((0, WHISK_SHOT[1] + 0.018), fade=0.097)
    emptying = moving(pouring(), swing=0.75, per_s=45)
    sifting = moving(sieve(), swing=1.4, per_s=70)
    background = room_noise() + working_rumble() + fan()
    return salt() + stirring + emptying + setting_down() + sifting + background


def record(dry):
    """A steep elliptic low-pass cuts the top."""
    return signal.sosfilt(signal.ellip(12, .1, 70, CUTOFF_HZ, fs=SR, output="sos"), dry)


dry = scene()
out = record(dry)
master_out(out)
```